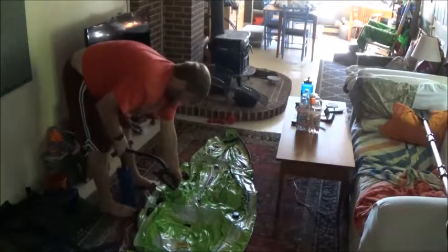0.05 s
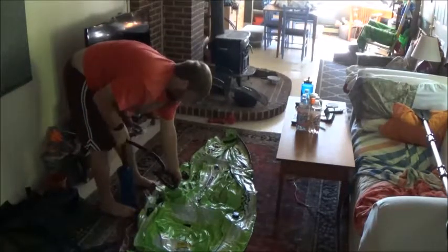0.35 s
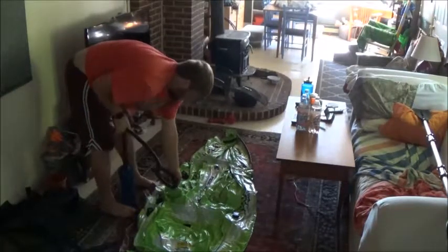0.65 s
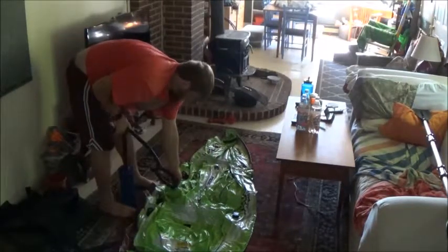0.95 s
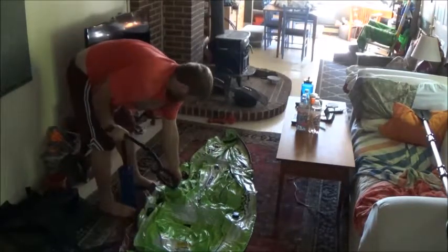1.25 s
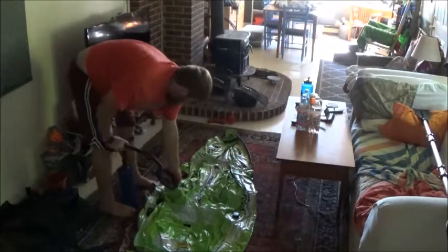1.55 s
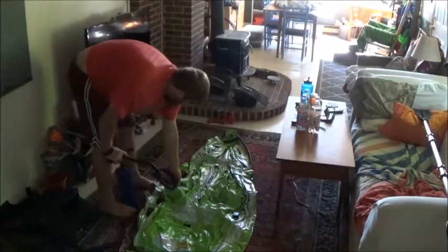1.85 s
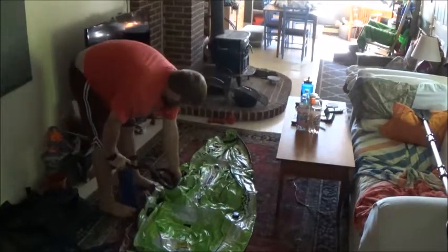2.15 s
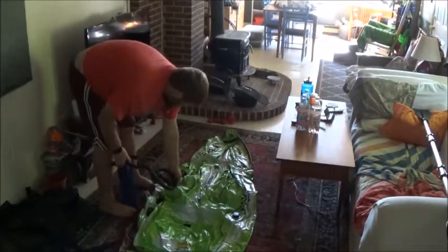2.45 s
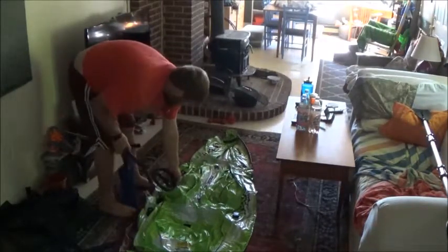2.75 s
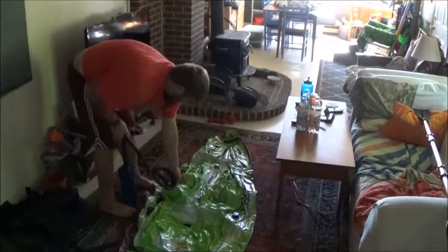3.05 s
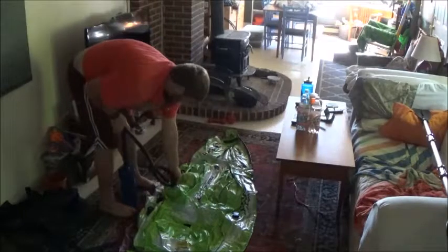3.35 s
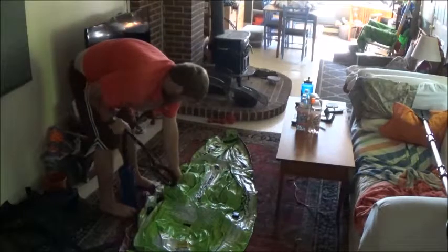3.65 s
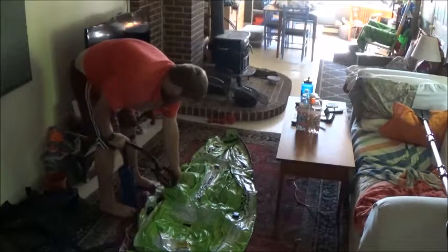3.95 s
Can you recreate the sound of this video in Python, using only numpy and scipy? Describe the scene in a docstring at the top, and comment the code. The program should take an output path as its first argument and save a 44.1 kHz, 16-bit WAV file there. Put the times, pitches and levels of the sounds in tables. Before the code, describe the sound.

A hand pump pushes air through a hose into an inflatable boat in four hissing strokes with a thin, high whistle. The piston thumps and clacks between them, slightly left of a stereo microphone in a quiet living room.

```python
"""A hand pump fills an inflatable boat: four strokes of air hiss through a ribbed hose and the valve. The hose
rings with its pipe resonances, its ribs sing breathily and the valve whistles as the flow builds. The piston
rubs along the barrel, thumping and clacking at the ends of its travel. Heard in a quiet living room with a
faint mains hum, the pump a little left of a stereo microphone pair."""
import sys
import numpy as np
from scipy import signal
from scipy.fft import rfft, irfft, next_fast_len
from scipy.io import wavfile
from scipy.ndimage import map_coordinates

SR = 44100
rng = np.random.default_rng(int(sys.argv[2]) if len(sys.argv) > 2 else 0)


def digitize_waveform(pressure):
    """Quantize a signal to 16-bit integers and store it at the path in sys.argv[1].

    Rows of a 2-D input are taken as channels; values are limited to [-1, 1].
    """
    field = np.atleast_2d(pressure).T
    bounded = np.clip(field, -1, 1)
    quanta = np.round(bounded * 32767).astype(np.int16)
    wavfile.write(sys.argv[1], SR, quanta)


N = 176400
FULL_FLOW_DB = -23.5  # air flow of a firm stroke
# how unlike the room sounds at the two microphones (f/Hz, side over mid)
STEREO_SPREAD = [(60, .12), (150, 0.26), (300, 0.5), (700, 0.6), (4000, .44), (8000, 0.52)]


def hose_air(flow_db, width_hz=25.6):
    """A dull rush at low flow; the valve's jet takes over as the flow grows. Both ring the hose."""
    # spectra of the valve's jet and of the air in the hose (f/Hz, level/dB)
    jet_spectrum = [(120, -35), (200, -27.5), (450, -18), (750, -23.5), (950, -20), (1800, -10.5),
                    (2250, -5), (2600, -1), (3450, -2), (4500, -3.5), (5300, -7), (6300, -11.5),
                    (7400, -14.5), (8000, -9), (8700, -10.5), (11000, -17.5)]
    rush_spectrum = [(100, -46), (400, -8), (800, -3), (1100, -1.5), (2000, 3.5), (3600, -2), (4800, -4.5),
                     (5600, -52), (8000, -17), (11000, -25)]
    # pipe resonances of the hose (f/Hz, level/dB over the plain hiss)
    modes = [(940, 4), (1040, 4), (1503, 6), (1625, 3), (1924, 7), (2531, 7), (2619, 5), (2821, 4),
             (3050, 4), (3166, 5), (3256, 4), (3403, 7), (3483, 6), (3596, 2), (3854, 5), (4049, 0),
             (4274, 5), (4374, 1), (4533, 4), (4795, 4)]
    jet = amp(-27 + 1.16 * (flow_db - FULL_FLOW_DB + 0.48 * wobble(30.25))) * noise(jet_spectrum)
    drive = amp(0.99 * (flow_db + 38.5))  # the rush levels off above a flow of -38.5 dB
    rush = amp(-40.5) * drive / np.sqrt(1 + drive ** 2) * noise(rush_spectrum)
    peaks = [(hz, np.sqrt(1 + amp(db) ** 2) - 1) for hz, db in modes]
    pipe = lambda f: 1 + sum(gain / (1 + 2j * (f - hz) / width_hz) for hz, gain in peaks)
    return filtered(jet + rush, pipe)


def edge_tones(flow_db):
    """The ribbed hose's breathy edge tone sharpens with air speed; a lower band glides along with it."""
    # edge tone, one curve a stroke (t/s, f/Hz, level/dB)
    curves = [
        [(0, 3517, -79), (.13, 3560, -45), (.34, 3692, -28), (.41, 3864, -39), (.5, 4250, -35.5),
         (.7, 4290, -46), (.8, 4200, -80)],
        [(1.2, 3494, -76), (1.3, 3639, -36), (1.37, 3852, -31), (1.48, 4204, -36.5), (1.93, 4560, -43),
         (2.16, 4220, -32.5), (2.25, 4120, -77)],
        [(2.48, 3280, -82), (2.58, 3485, -29.5), (2.67, 4258, -35.5), (2.85, 4810, -31), (3, 4800, -32),
         (3.2, 4480, -42), (3.31, 3726, -32), (3.38, 3520, -80)],
        [(3.74, 3443, -82), (3.785, 3625, -30), (3.87, 4375, -29), (3.96, 4574, -29), (4, 4460, -34)],
    ]
    hz, gain = stroke_curves(curves)
    lower = amp(-34 + flow_db - FULL_FLOW_DB) * fuzzy_tone(0.73 * hz, width_hz=127)
    return gain * fuzzy_tone(hz, width_hz=120) + lower


def valve_whistle(flow_db, breakup_db=-22.5):
    """The valve whistles at full flow and breaks up into a band of hiss when pushed hard."""
    # whistle, one curve a stroke (t/s, f/Hz, level/dB)
    curves = [
        [(.42, 6850, -44), (.52, 6930, -40.5), (.68, 6980, -39.5), (.74, 6900, -50)],
        [(1.38, 6950, -64), (1.46, 7000, -37), (1.53, 6980, -33.5), (1.6, 7150, -37), (1.76, 7100, -35),
         (1.92, 7230, -31.5), (2.04, 7050, -33.5), (2.1, 6990, -26), (2.17, 6900, -70)],
        [(2.63, 6750, -56), (2.7, 6980, -27), (2.76, 7150, -35.5), (2.83, 7350, -29), (2.98, 7520, -27.5),
         (3.15, 7180, -32), (3.24, 7000, -37), (3.29, 6900, -70)],
        [(3.83, 6850, -70), (3.9, 7000, -30.5), (4, 7020, -32)],
    ]
    hz, gain = stroke_curves(curves)
    hz = hz + 25 * wobble(25)
    rough_share = 1 / (1 + amp(np.clip(4 * (breakup_db - flow_db), -100, 100)))
    narrow = np.sqrt(1 - rough_share) * fuzzy_tone(hz, width_hz=75)
    rough = np.sqrt(rough_share) * fuzzy_tone(hz, width_hz=422)
    return gain * amp(1.83 * wobble(25.06)) * (narrow + rough)


def valve_chirps():
    """Thin whistles at middling air speed glide up as the flow builds and down as it dies."""
    # glides (t/s, length/s, first f/Hz, last f/Hz, level/dB)
    chirps = [(.26, .2, 8840, 9220, -35), (1.275, .17, 8860, 9230, -29.5), (2.555, .11, 8770, 9300, -35),
              (3.277, .052, 9150, 8860, -28), (3.772, .045, 8880, 9080, -25.5)]
    out = np.zeros(N)
    for start, length, first_hz, last_hz, db in chirps:
        hz = np.interp(clock(), [start, start + length], [first_hz, last_hz]) + 45 * wobble(300)
        envelope = amp(db + 2 * wobble(70)) * arch(start, length)
        out += envelope * np.sin(2 * np.pi * np.cumsum(hz) / SR)
    return out


def piston_thumps(rise_s=0.0077):
    """The piston reaches its stop, the pump shoves the floor and the boards shudder."""
    # shoves on the floor (t/s, level/dB, f/Hz)
    thumps = [(.731, -25.5, 144), (1.013, -47, 128.4), (1.179, -39, 90), (1.193, -29, 86),
              (2.173, -27.5, 170.7), (2.466, -30, 108.9), (2.942, -38, 195), (3.318, -22.5, 133.2),
              (3.597, -37, 118), (3.69, -36, 93.8), (3.703, -29.5, 73.4), (3.971, -35, 167)]
    # spectrum of the floorboards (f/Hz, level/dB)
    board_spectrum = [(20, -16), (45, -7.5), (120, -6.5), (190, -2.5), (330, -19.5), (700, -20.5),
                      (2000, -74)]
    out, boards = np.zeros(N), noise(board_spectrum)
    for start, db, hz in thumps:
        push = 2 * strike(start, rise_s, t60=0.072) * np.sin(2 * np.pi * hz * (clock() - start))
        shudder = amp(-13.5) * strike(start, rise_s, t60=0.35) * boards
        out += amp(db) * (push + shudder)
    return out


def seal_rub():
    """The piston seal slides along the barrel with a hollow rub."""
    # slides (t/s, length/s, level/dB)
    rubs = [(1.18, 0.89, -46.5), (2.45, 0.92, -41), (3.679, .6, -38)]
    # resonances of the rub (f/Hz, width/Hz, level/dB)
    modes = [(1000, 115, -4), (1340, 410, 1)]
    envelope = sum(amp(db) * np.sqrt(np.abs(arch(start, length))) for start, length, db in rubs)
    return envelope * resonant(modes)


def plastic_clacks():
    """Handle and flap valve click on contact and briefly ring the hollow barrel."""
    # contacts (t/s, barrel level/dB, click level/dB)
    contacts = [(0.725, -39, -29.5), (1.177, -26, -26.5), (1.197, -32.5, -37), (2.174, -42, -32.5),
                (2.417, -32, -39), (2.446, -59, -35.5), (3.292, -40, -38), (3.691, -29.5, -29.5),
                (3.71, -42, -31)]
    # resonances of the barrel (f/Hz, width/Hz, level/dB)
    barrel_modes = [(434, 54, 4), (504, 75, -1), (820, 300, -11), (1310, 45, -21)]
    # spectrum of the click (f/Hz, level/dB)
    click_spectrum = [(200, 16.5), (900, 2.5), (2200, 13.5), (4000, -11), (6000, -28), (11000, -10)]
    out, barrel, click = np.zeros(N), resonant(barrel_modes), noise(click_spectrum)
    for start, barrel_db, click_db in contacts:
        out += amp(barrel_db) * strike(start, rise_s=0.0012, t60=0.069) * barrel
        out += amp(click_db) * strike(start, rise_s=0.0021, t60=0.095) * click
    return out


def light_scrapes():
    """The rod and the vinyl give small grainy scrapes between strokes."""
    # scrapes (t/s, length/s, level/dB, centre f/Hz)
    scrapes = [(0.984, 0.015, -51, 6000), (1.06, .026, -47.5, 1570), (3.574, 0.032, -48.5, 1570),
               (3.615, .03, -52, 2590), (3.665, 0.009, -49.5, 4500)]
    grain = unit(amp(3.23 * wobble(440)))
    return grain * sum(amp(db) * arch(start, length) * resonant([(hz, 0.82 * hz, 0)])
                       for start, length, db, hz in scrapes)


def living_room(x, renew_s=0.4):
    """Direct sound plus a slowly shifting tail that differs a little between the two microphones."""
    # reverberation time (f/Hz, t60/s)
    decay = [(100, 0.2), (500, 0.33), (2500, 0.32), (5000, 0.38), (10000, 0.26)]
    # tail over the direct sound at the microphones (f/Hz, level/dB)
    tail_level = [(100, -14), (250, -8.5), (600, -4.5), (1500, -2), (4000, -1.5), (9000, -3.5)]
    hop = int(renew_s * SR)
    padded, wet = np.pad(x, (hop, 2 * hop)), np.zeros((2, N + 2 * SR))
    for i in range(0, N + hop, hop):  # each overlapping stretch gets a fresh tail
        hz, t, spectra = signal.stft(rng.standard_normal((2, SR // 2)), SR, nperseg=256)
        fade = np.exp(-np.log(1000) * t / along(decay, hz)[:, None])
        tail = signal.istft(spectra * fade, SR, nperseg=256)[1]
        stretch = padded[i:i + 2 * hop] * np.hanning(2 * hop)
        reverb = signal.fftconvolve(stretch[None], tail / np.linalg.norm(tail[0]), axes=1)
        wet[:, i:i + reverb.shape[1]] += reverb
    mid, side = wet[:, hop:hop + N]
    mix_angle = lambda hz: np.arctan(amp(along(tail_level, hz)))  # equal-power mix
    direct = filtered(x, lambda hz: np.cos(mix_angle(hz)))
    return direct + filtered(stereo(mid, side), lambda hz: np.sin(mix_angle(hz)))


def room_tone(hum_hz=122):
    """Faint noise of the still room, with a mains hum."""
    # spectrum of the still room (f/Hz, level/dB)
    spectrum = [(25, -7), (60, -2), (120, -3.5), (200, -7), (500, -9.5), (1000, -13.5), (3000, -18),
                (11000, -22)]
    hum = amp(-63) * np.sin(2 * np.pi * hum_hz * clock())
    return amp(-56) * stereo(noise(spectrum), noise(spectrum)) + hum


def stereo(mid, side):
    """Left and right microphone signals, most alike in the bass."""
    side = filtered(side, lambda hz: along(STEREO_SPREAD, hz))
    return np.array([mid + side, mid - side])


def amp(db):
    """Decibels to gain."""
    return 10 ** (np.asarray(db) / 20)


def unit(x):
    """Scale to rms 1."""
    return x / np.sqrt(np.mean(x ** 2) + 1e-20)


def along(points, hz):
    """Interpolate (f/Hz, value) points on a log frequency axis."""
    f, values = np.transpose(points)
    return np.interp(np.log(hz + 1), np.log(f + 1), values)


def clock():
    """Seconds at every sample."""
    return np.arange(N) / SR


def wobble(rate):
    """A smooth random curve with `rate` knots a second."""
    return map_coordinates(rng.standard_normal(2000), [clock() * rate], mode="wrap")


def filtered(x, response):
    """Filter x by a gain given as a function of frequency."""
    size = next_fast_len(N + SR // 2)
    return irfft(rfft(x, size) * response(np.fft.rfftfreq(size, 1 / SR)), size)[..., :N]


def noise(spectrum):
    """Noise of rms 1 with a (f/Hz, level/dB) colour."""
    return unit(filtered(rng.standard_normal(N), lambda hz: amp(along(spectrum, hz))))


def resonant(modes):
    """Noise of rms 1 ringing in (f/Hz, width/Hz, level/dB) resonances."""
    power = lambda f: sum((amp(db) * f * width) ** 2 / ((hz * hz - f * f) ** 2 + (f * width) ** 2)
                          for hz, width, db in modes)
    return unit(filtered(rng.standard_normal(N), lambda f: np.sqrt(power(f))))


def fuzzy_tone(hz, width_hz):
    """A turbulent whistle of rms 1: a band of noise around a moving pitch."""
    a, b = filtered(rng.standard_normal((2, N)), lambda f: 1 / (1 + (f / width_hz) ** 2))
    phase = 2 * np.pi * np.cumsum(hz) / SR
    return unit(a * np.cos(phase) + b * np.sin(phase))


def strike(start, rise_s, t60):
    """Envelope of a blow: quick rise, exponential decay."""
    t, out = np.arange(SR // 2) / SR, np.zeros(N + SR)
    attack = 1 - np.exp(-(t / rise_s) ** 2)
    out[int(start * SR):][:len(t)] = attack * np.exp(-np.log(1000) * t / t60)
    return out[:N]


def arch(start, length):
    """Envelope that swells and fades once."""
    return np.sin(np.pi * np.clip((clock() - start) / length, 0, 1))


def stroke_curves(strokes):
    """Pitch and gain from one (t/s, f/Hz, level/dB) curve a stroke; silent between strokes."""
    times, hz, db = np.concatenate(strokes).T
    t = clock()
    sounding = sum((t >= rows[0][0]) & (t <= rows[-1][0]) for rows in strokes) > 0
    return np.interp(t, times, hz), sounding * amp(np.interp(t, times, db))


def scene():
    """The pump at work in the living room, a little left of centre."""
    # air flow, one curve a stroke (t/s, level/dB)
    strokes = [
        [(0, -50.5), (.13, -42.5), (.29, -29.5), (.36, -29), (.55, -26), (.725, -26.5), (.78, -57), (.9, -91)],
        [(1.172, -82), (1.182, -35.5), (1.24, -34.5), (1.35, -26), (1.55, -25.5), (1.74, -23.5), (1.95, -21.5),
         (2.175, -24), (2.225, -49), (2.35, -60)],
        [(2.42, -68), (2.46, -45.5), (2.53, -32.5), (2.6, -25.5), (2.75, -21), (2.9, -19.5), (3.1, -20),
         (3.315, -24), (3.37, -53), (3.5, -78)],
        [(3.686, -82), (3.696, -30), (3.77, -30), (3.785, -23), (3.84, -23), (3.89, -20.5), (4, -21)],
    ]
    # left microphone over right (f/Hz, level/dB)
    balance = [(100, -1), (500, 0.5), (1200, 1.3), (3000, 1.1), (8000, .7), (11000, 0)]
    flow_db = np.interp(clock(), *np.concatenate(strokes).T)
    air = hose_air(flow_db) + edge_tones(flow_db) + valve_whistle(flow_db) + valve_chirps()
    mechanism = piston_thumps() + seal_rub() + plastic_clacks() + light_scrapes()
    pan = lambda hz: amp(along(balance, hz) * np.array([[0.5], [-0.5]]))
    return filtered(living_room(air + mechanism), pan) + room_tone()


def record(dry):
    """The recorder keeps nothing above 11080 Hz."""
    return filtered(dry, lambda hz: hz < 11080)


dry = scene()
out = record(dry)
digitize_waveform(out)
```